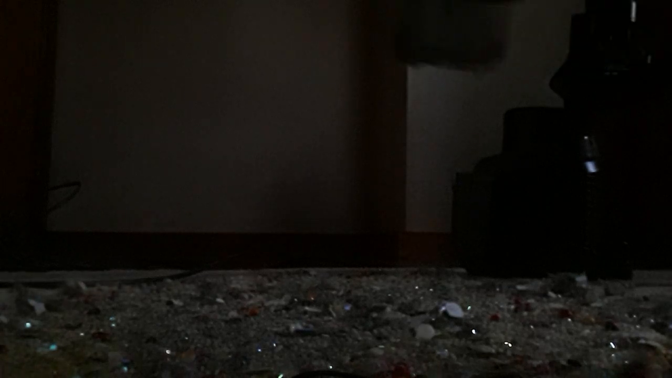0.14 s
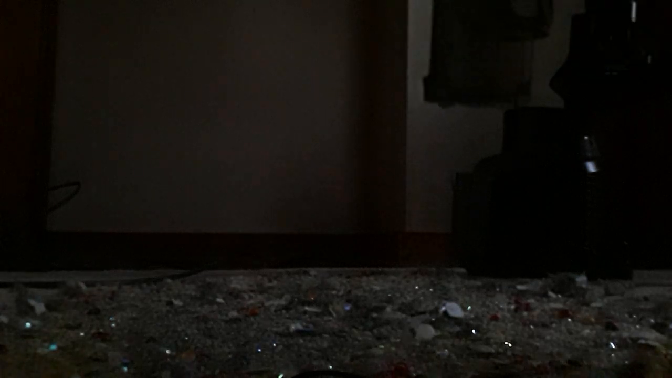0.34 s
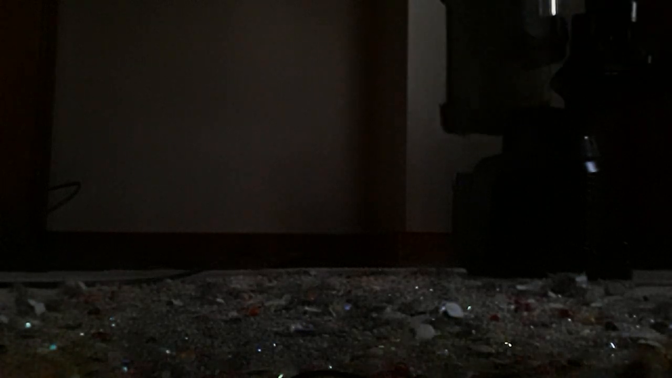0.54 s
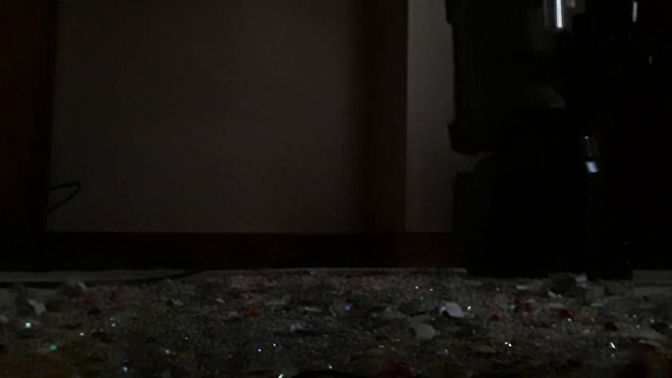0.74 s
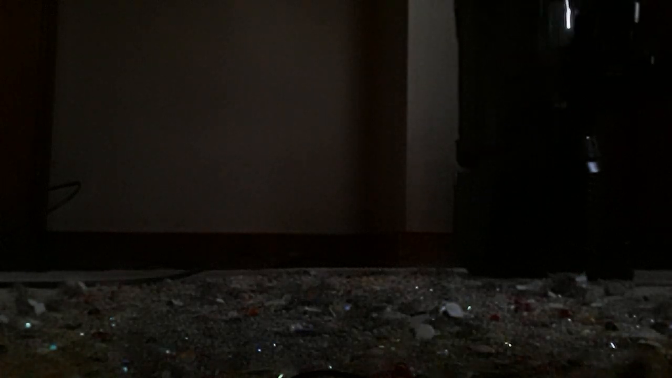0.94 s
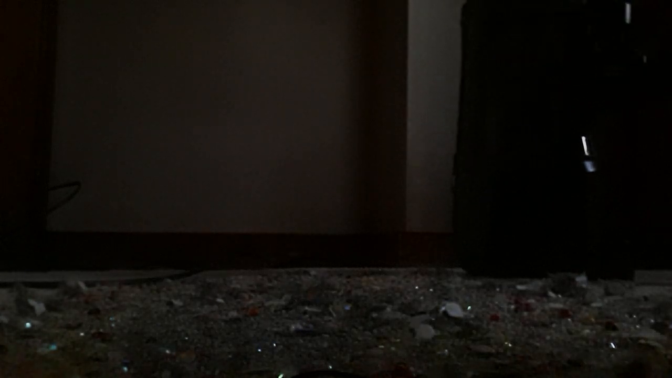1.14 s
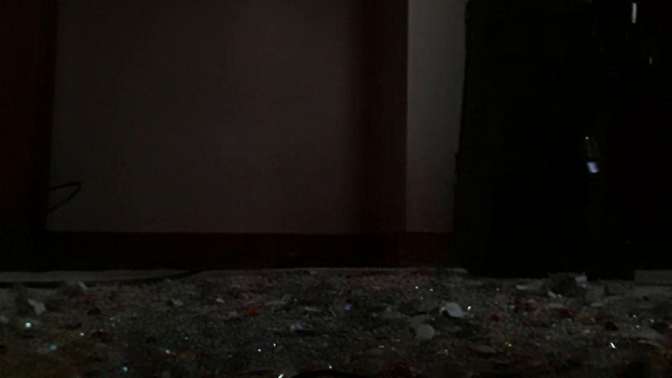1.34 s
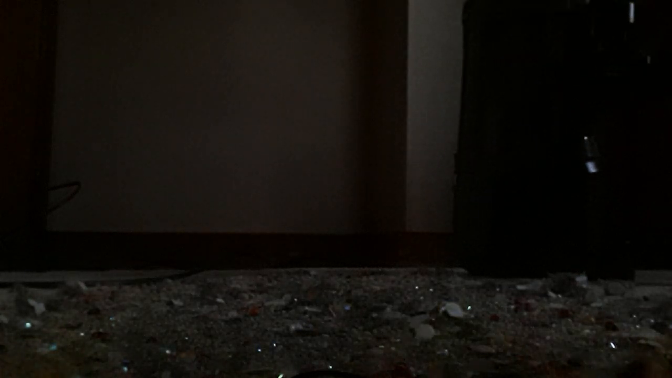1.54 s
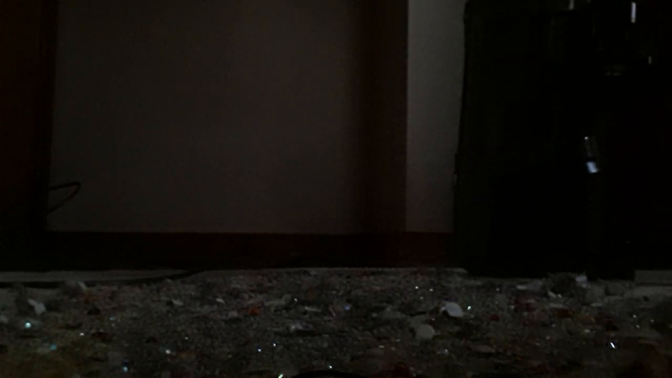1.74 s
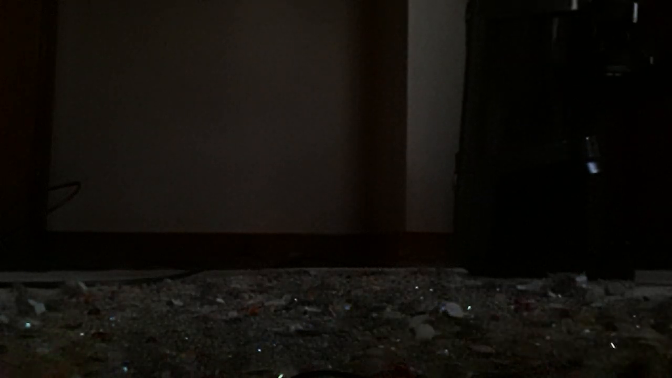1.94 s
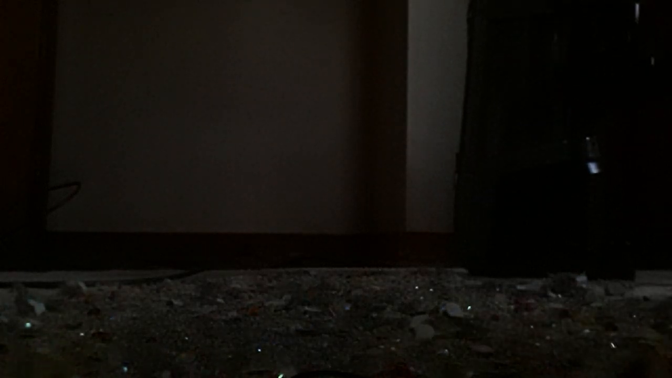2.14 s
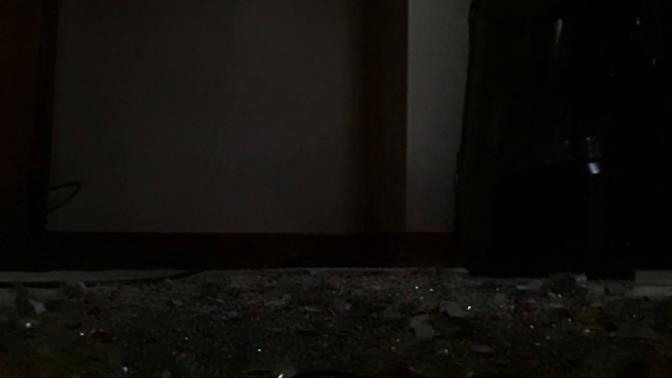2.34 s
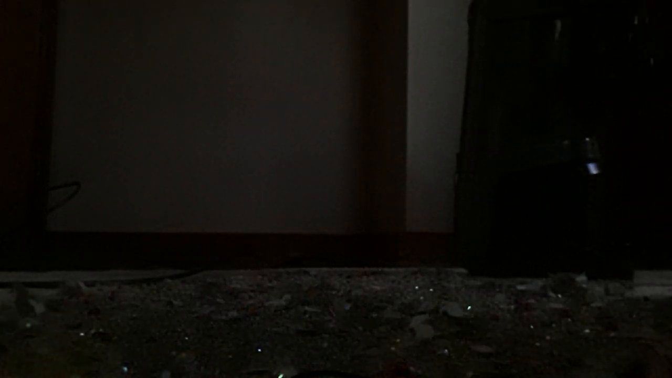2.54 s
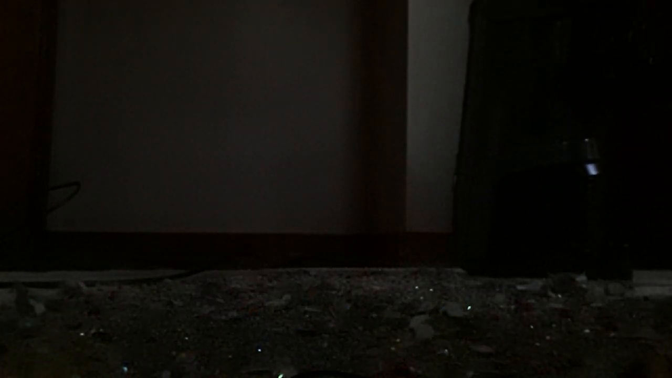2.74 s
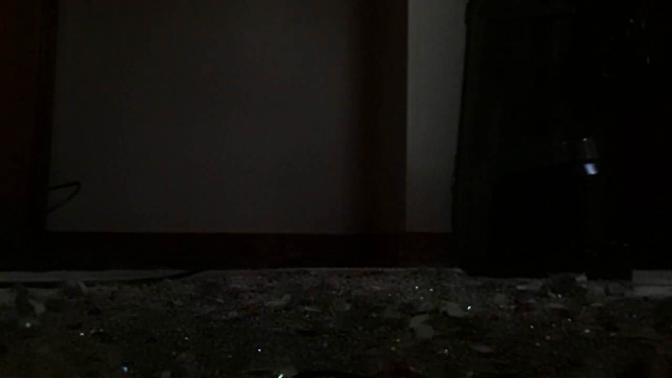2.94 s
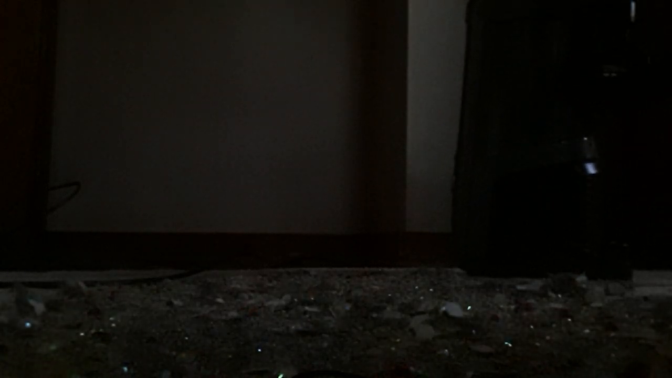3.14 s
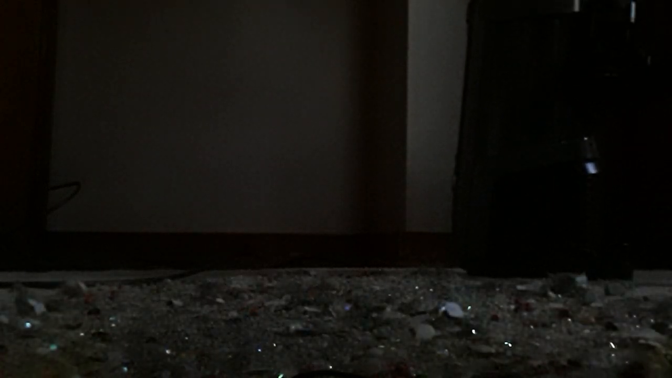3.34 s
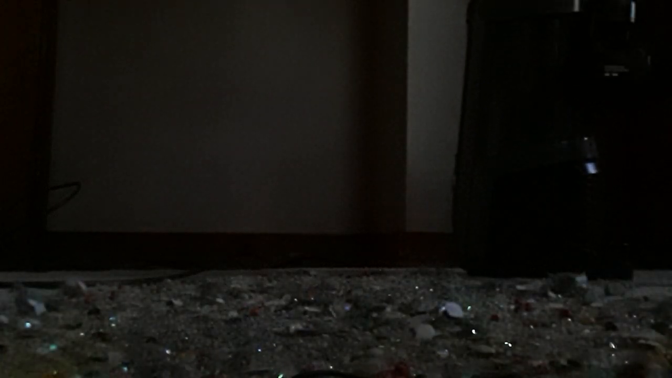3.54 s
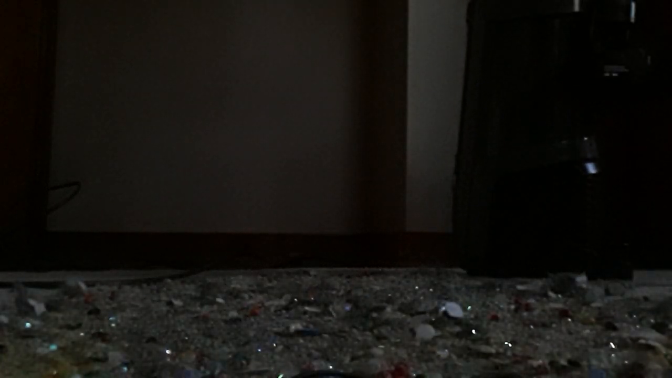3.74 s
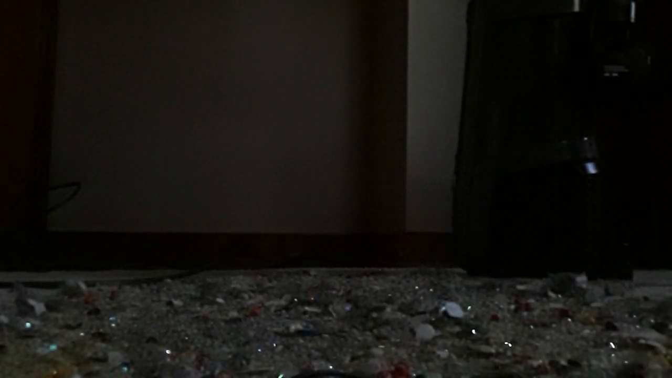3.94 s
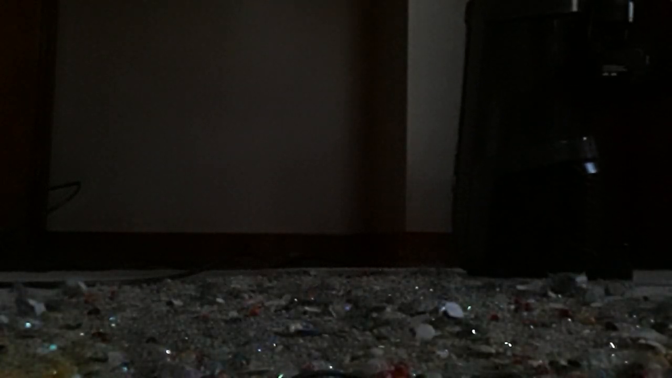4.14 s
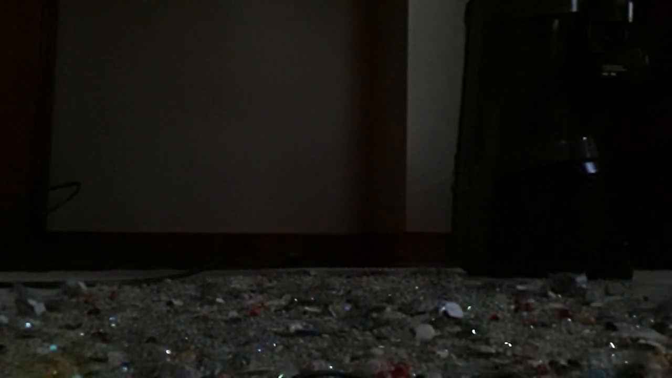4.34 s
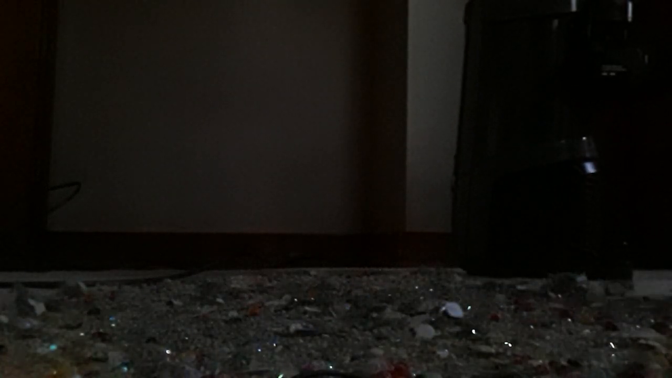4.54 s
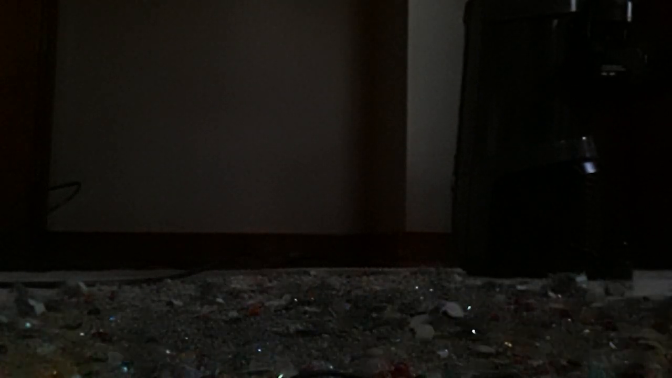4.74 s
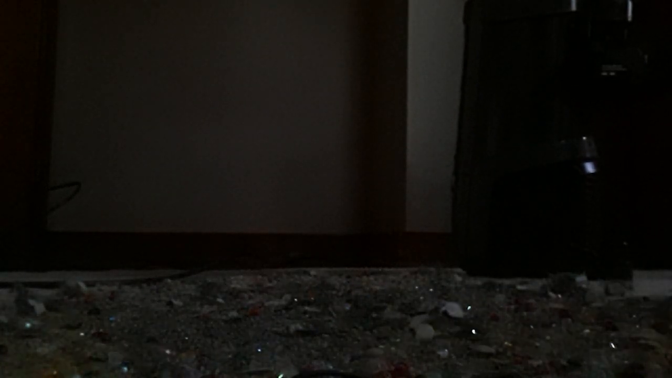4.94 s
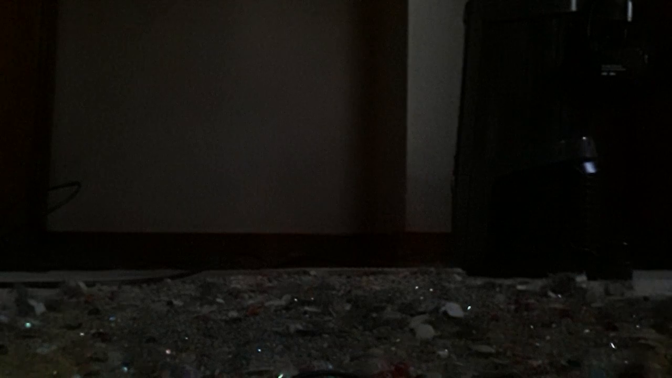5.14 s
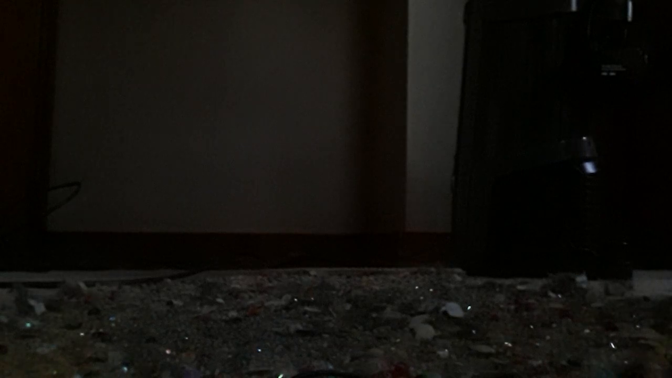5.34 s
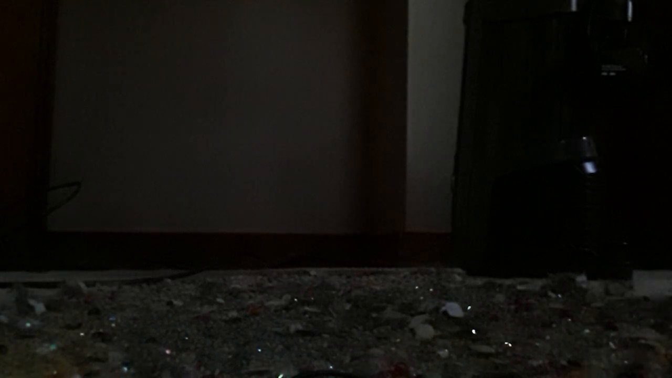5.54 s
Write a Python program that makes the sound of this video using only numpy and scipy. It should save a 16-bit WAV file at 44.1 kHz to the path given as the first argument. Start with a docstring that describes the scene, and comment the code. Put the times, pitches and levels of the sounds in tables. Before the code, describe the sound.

A hollow plastic container bumps into its seat with clustered knocks, gets fiddled with, then snaps shut sharply in a small bare room.

```python
"""A soft building rumble and a faint steady hiss come first, then a thin click of a loose part.
A hollow plastic container is pushed into its seat in four bumps, fiddled with, then snapped shut by a latch.
Each knock, tap and snap mixes a low ring, shaken walls, a clack near 1 kHz, a hard edge and a tick.
Rubbing is a patter of tiny clicks. A small bare room answers with fading noise."""
import sys
import numpy as np
from scipy import signal
from scipy.fft import rfft, irfft, next_fast_len
from scipy.io import wavfile
from scipy.ndimage import uniform_filter1d

SR = 44100
rng = np.random.default_rng(int(sys.argv[2]) if len(sys.argv) > 2 else 0)


def volts(x):
    """Linear amplitude factor 10**(x/20) for a level x in dB, scalar or array-like."""
    e = np.asarray(x, float) / 20
    return 10 ** e


def store_wav(level_fs):
    """Save 16-bit WAV to argv[1]."""
    pcm = np.round(np.clip(np.atleast_2d(level_fs), -1, 1) * 32767)
    wavfile.write(sys.argv[1], SR, pcm.T.astype(np.int16))


N = 246959  # length in samples

# colour of the building rumble: pitch_hz, relative level_db
RUMBLE_COLOUR = [(15, -39.5), (25, -18.5), (56, -7.5), (91, -8.5), (113, -2.5), (240, -6), (306, -7.5),
                 (471, -10), (617, -25), (725, -18.5), (1120, -24.5), (1350, -28), (1760, -34), (3950, -34),
                 (15600, -38.5)]
# resonances in the rumble: pitch_hz, width_hz, level_db before swelling
RUMBLE_RESONANCES = [(114.3, 6.8, -81), (319.5, 40, -69.5), (628, 300, -72)]
# colour of the faint steady hiss, unequal and opposite in the two channels: pitch_hz, relative level_db
HISS_COLOUR = [(35, -46), (60, 3.5), (242, 0), (395, 2), (644, 0.5), (2110, -4), (8140, -4), (15600, -7.5)]
# thin dry clicks of a loose part: start_s, level_db, centre_hz
LOOSE_CLICKS = [(0.207, -56.5, 1780), (0.711, -45.5, 1780), (2.034, -55, 2000), (2.076, -63, 2000),
                (2.113, -64, 1800), (2.19, -52, 2200), (2.274, -61, 2640), (3.316, -42, 1300),
                (3.3206, -36.5, 3000), (3.3255, -45, 3320), (4.698, -57, 6000)]
# colour of those clicks: multiple of the centre (no unit), level_db
CLICK_SHAPE = [(.25, -22), (.67, 3.5), (1.5, -3), (2.6, -13), (4, -42)]
# how long the room takes to die by 60 dB: pitch_hz, fade_s
ROOM_FADE = [(300, 0.31), (700, 0.23), (1800, 0.27), (4800, 0.21), (12000, 0.22)]
# knocks on the shell, from heavy bumps to faint taps, each with its own thud level:
# start_s, clack_db, thud_db (re clack), thud_tilt_db (per octave), edge_db (re clack), clack_hz
SHELL_KNOCKS = [(0.352, -26.5, 4.5, -5, -11, 1044), (0.363, -27, -12, 0, -3, 910),
                (0.546, -27, -2, -4, -14, 990), (0.568, -24.5, 2.5, -5.5, -9, 884),
                (0.576, -26, 2.5, 2.5, -10, 970), (0.589, -28.5, -11, 13, -5, 934),
                (0.603, -34, -28, 0, -22, 780), (0.753, -26.5, -2, 6.5, -12, 1070),
                (0.782, -22, -28, 9, -22, 870), (0.79, -20, 2.5, 0.5, -12.5, 1030),
                (0.799, -18.5, 1, 4, -5, 800), (0.812, -33, -30, 15.5, -30, 883),
                (0.8455, -21.5, -8.5, 2, -21, 1063), (0.87, -45, 12, 1, -20, 1110),
                (0.994, -45, 12.5, -7, -9.5, 1150), (1.013, -45, 16, 8.5, -3.5, 796),
                (1.049, -19.5, 6.5, -2.5, -14, 954), (1.064, -25.5, 4, -5, -4.5, 800),
                (1.099, -22.5, -2.5, 10, -15, 996), (1.112, -20, -3, 3, -5.5, 873),
                (1.131, -41.5, 13.5, -3.5, -27, 770), (1.44, -37, -5.5, -9, -14, 886),
                (2.254, -46.5, -1, -10, -3, 750), (2.363, -48.5, 3.5, 0.5, -8.5, 920),
                (4.636, -44.5, 2.5, -5.5, -8.5, 977), (4.893, -47.5, 1.5, -3.5, -16, 893)]
# light taps of the fingers: start_s, clack_db, edge_db (re clack), clack_hz
FINGER_TAPS = [(0.486, -44.5, -7, 980), (1.362, -35, -25, 906), (1.787, -35.5, -25, 865),
               (1.886, -39.5, -19, 891), (1.98, -40.5, -7, 943), (2.154, -42.5, -3.5, 700),
               (2.217, -37, -16, 920), (2.344, -42, -7, 1070), (2.448, -36, -22, 866),
               (2.503, -37, -21.5, 943), (2.587, -41, -19, 994), (3.782, -50, -18.5, 832),
               (3.897, -37.5, -26, 853), (3.949, -48.5, -18, 752), (4.143, -46, -17, 815),
               (4.185, -47.5, -18.5, 956), (4.426, -39, -33, 780), (4.582, -44.5, -17, 1035),
               (4.956, -54.5, -20, 886), (5.27, -46, -17, 759), (5.462, -46.5, -16.5, 854)]
# low ringing modes of the shell: pitch_hz, level_db, fade_s (to fall by 60 dB)
SHELL_MODES = [(133.7, 8.5, 0.16), (185.4, 5.5, 0.23), (264.1, 6.5, 0.32), (291.6, 8.5, 0.14),
               (456, -9.5, 0.32)]
# colour of the shaken shell walls: pitch_hz, level_db
SHELL_WALLS = [(40, -18), (120, -12.5), (220, -30.5), (310, -2), (380, -3.5), (445, -1), (510, -9.5),
               (590, -4.5), (720, -5), (1000, -39.5), (2000, -78)]
# colour of the hard edge of each contact: pitch_hz, level_db
HARD_EDGE = [(300, -52), (700, -23), (1300, 7.5), (1950, 5), (2400, -2.5), (2800, -0.5), (3200, -6.5),
             (3650, -5.5), (4400, -11.5), (6000, -42), (10000, -78.5)]
# colour of the tick in knocks and taps: pitch_hz, level_db
SHELL_TICK = [(1500, -64), (3500, -18), (5100, 3), (6300, -2.5), (8200, -1), (10000, -9.5), (12000, -16),
              (16000, -26)]
# plastic sliding on plastic: start_s, peak_s, end_s, peak_db, treble_swish_db
SLIDES = [(0.786, 0.788, .9, -33, -11.5), (1.038, 1.085, 1.197, -40, -6.5), (1.296, 1.47, 1.46, -59, -10),
          (1.755, 1.898, 2.4, -67, 2), (2.088, 2.22, 2.6, -65.5, -7), (2.307, 2.394, 2.6, -67, -20),
          (3.885, 3.964, 4.07, -64, -20.5), (4.1, 4.16, 4.27, -66, 9), (4.545, 4.65, 4.72, -66.5, 19.5),
          (4.881, 4.927, 4.97, -67, 2)]
# colour of the dull part of the sliding: pitch_hz, level_db
SCUFF_COLOUR = [(100, -40.5), (300, -8.5), (900, 6), (1800, -4), (3500, -16.5), (6000, -31), (11000, -65)]
# colour of the treble swish in the sliding: pitch_hz, level_db
SWISH_COLOUR = [(1500, -28), (3000, -7), (5000, -5), (6500, -5), (8500, 1.5), (10500, -21), (14000, -21.5)]
# latch snaps: start_s, clack_db, wall_db (re clack, before the common wall level), edge_db (re clack), clack_hz
LATCH_SNAPS = [(2.6276, -24.5, -4.5, -19.5, 1040), (2.6344, -10.5, -12, -27, 1070),
               (2.6397, -10, -1.5, -6.5, 940), (2.6429, -12.5, 1, -8, 998), (2.999, -32.5, -1, -7, 913),
               (3.0559, -20.5, -5, -10.5, 950), (3.062, -24, -3.5, -8.5, 804)]
# the floor under the shell: pitch_hz, level_db, fade_s (to fall by 60 dB)
FLOOR_MODES = [(62, 0, .12), (92, 0, .1), (178, -1.5, .12)]
# colour of the walls near the latch: pitch_hz, level_db
LATCH_WALLS = [(100, -30), (220, -16.5), (320, -4), (430, -4), (590, -0.5), (720, -1), (1000, -4),
               (1300, -7.5), (1800, -23.5), (3000, -50.5)]
# colour of the latch tick: pitch_hz, level_db
LATCH_TICK_COLOUR = [(1470, -35), (2500, -1), (3050, -11), (3780, -0.5), (4200, -13), (5160, -11),
                     (5790, -22), (8230, -16.5), (11200, -37.5), (15500, -40.5)]
# strength of the direct sound, strongest at the latch snap, weakest at the end: time_s, level_db
DIRECT_LEVEL = [(0, -3), (1.7, -2.5), (2.65, 0), (3.0, -3.5), (5.6, -9)]

WALL_DB = -7.5  # common wall level, added to the thud level or to the wall level of a snap
SCATTER_DB = 2  # how much the strength of each ringing mode varies from blow to blow
LUCK_SIZE = 2048  # random samples that shape one part of a contact


def colour(x, points):
    """Weights the spectrum of x by (Hz, dB) points."""
    size = next_fast_len(len(x))
    hz, db = np.transpose(points)
    f = np.maximum(np.arange(size // 2 + 1) * SR / size, 1)
    gain = volts(np.interp(np.log(f), np.log(hz), db))
    return irfft(rfft(x, size) * gain, size)[:len(x)]


def level(x, db):
    """Scales x to an rms level."""
    return x * volts(db) / np.sqrt(np.mean(x ** 2))


def add(track, sound, s):
    """Mixes a sound into the track from time s."""
    i = int(s * SR)
    track[i:i + len(sound)] += sound[:len(track) - i]


def walk(rate):
    """Random levels held for 1 / rate seconds and smoothed twice."""
    hold = int(SR / rate)
    steps = np.repeat(rng.standard_normal(N // hold + 1), hold)
    return uniform_filter1d(uniform_filter1d(steps, hold), hold)[:N]


def rumble():
    """Building rumble fading up into hiss; its resonances swell and fade on their own."""
    out = level(colour(rng.standard_normal(N), RUMBLE_COLOUR), -62.5)
    for hz, width, db in RUMBLE_RESONANCES:
        peak = [(hz - 2 * width, -50), (hz, 0), (hz + 2 * width, -50)]
        band = colour(rng.standard_normal(N), peak)
        swell_db = 3.0 * walk(6.5)
        out = out + level(band, db) * volts(swell_db)
    return out


def steady_hiss():
    """Faint steady hiss: one coloured noise, unequal and opposite in the two channels."""
    hiss = level(colour(rng.standard_normal(N), HISS_COLOUR), -77.5)
    return hiss * np.array([[.6], [-1.4]])


def crack(points, chance, t60, rise_s):
    """A burst of tiny slips: the timing of a fading noise with the even spectrum of the points, peak near 1."""
    t = np.arange(len(chance)) / SR
    fade = np.exp(-np.log(1000) * t / t60)
    spectrum = rfft(chance * (1 - np.exp(-t / rise_s)) * fade)
    # even out the random peaks and dips of the spectrum, but keep its timing
    strength = np.abs(spectrum)
    burst = colour(irfft(spectrum / (strength + .3 * strength.mean())), points)
    burst = burst * np.minimum(t / rise_s, 1) * np.cos(np.pi / 2 * t / t[-1]) ** 2
    return burst / np.sqrt(np.sum(burst ** 2) / (t60 * SR / 20))


def clicks():
    """Single slips, each a wide burst of a millisecond or two round its own centre."""
    out = np.zeros(N)
    for s, db, hz in LOOSE_CLICKS:
        points = [(k * hz, part_db) for k, part_db in CLICK_SHAPE]
        add(out, volts(db) * crack(points, rng.standard_normal(512), 0.011, 0.00031), s)
    return out


def room(x):
    """Diffuse echo: half-octave noise bands that build up in a few ms and die at their own rates."""
    build_s, far_wall_s, near_wall_share = 0.0037, .015, 0.53
    late_db, late_stretch = -22.5, 2.25  # the next room answers faintly and dies more slowly
    t = np.arange(int(.6 * SR)) / SR
    hz, t60 = np.transpose(ROOM_FADE)
    tail = 0
    for f in 250 * 2 ** np.arange(0, 6.2, .5):
        edges = [(f / 1.5, -60), (f / 1.19, 0), (f * 1.19, 0), (f * 1.5, -60)]
        band = level(colour(rng.standard_normal(len(t)), edges), 0)
        fall = np.log(1000) * t / np.interp(np.log(f), np.log(hz), t60)
        fade = np.exp(-fall) + volts(late_db) * np.exp(-fall / late_stretch)
        tail = tail + np.sqrt(f) * band * fade  # wider bands carry more power
    # the nearest walls answer first, the far ones in a bunch some ms later
    far = (1 - near_wall_share) / (1 + np.exp((far_wall_s - t) / .002))
    tail = tail * (1 - np.exp(-(t / build_s) ** 2)) * (near_wall_share + far)
    # many overlapping modes: no single pitch stands far out
    spectrum = rfft(tail)
    size = np.abs(spectrum)
    strength = uniform_filter1d(size, size=9) / uniform_filter1d(size, size=151)
    tail = irfft(spectrum / strength ** .15, len(t))
    tail = tail * np.clip(4 * (.8 - t / t[-1]), 0, 1)  # ends in silence
    return signal.fftconvolve(x, tail / np.sqrt(np.sum(tail ** 2)))[:N]


def ring(modes, luck, rise_cycles):
    """Decaying modes of one blow, peak near 1; the contact spot varies their strength and pitch a little."""
    hz, db, t60 = np.transpose(modes)[:, :, None]
    t = np.arange(int(max(t60[:, 0]) * SR)) / SR
    luck = luck[:2 * len(hz), None]
    gain = volts(db + SCATTER_DB * luck[::2])
    swing = np.sin(2 * np.pi * hz * (1 + .02 * luck[1::2]) * t)
    # each mode needs some cycles to build up, so the lows come late
    build = 1 - np.exp(-(t * hz / rise_cycles) ** 2)
    fade = np.exp(-np.log(1000) * t / t60)
    return (gain * swing * build * fade).sum(axis=0) / np.sqrt(np.sum(gain ** 2))


def hard_contact(wall, clack, edge_db, tick, luck):
    """The short hard parts of one contact: shaken walls, a ringing clack, a hard edge and a tick."""
    wall_points, wall_db = wall
    hz, clack_t60 = clack
    tick_points, tick_db = tick  # tick level re edge
    clack_luck, tick_luck, wall_luck = luck
    modes = [(hz, 0, clack_t60), (0.93 * hz, -5, .014), (0.8 * hz, -7, .013), (0.81 * hz, -8, .012)]
    out = volts(wall_db + WALL_DB) * crack(wall_points, wall_luck, 0.063, 0.0018)
    add(out, ring(modes, clack_luck, 1.1), 0)
    out += volts(edge_db) * crack(HARD_EDGE, clack_luck, 0.025, 0.0018)
    out += volts(edge_db + tick_db) * crack(tick_points, tick_luck, 0.04, 0.0018)
    return out


def strike_shell(lows, hard, row, clack_t60, tick_db):
    """A blow on the shell: low modes ring on by themselves, hard parts are short and die fast."""
    s, clack_db, thud_db, tilt_db, edge_db, hz = row
    luck = rng.standard_normal((4, LUCK_SIZE))
    lowest = SHELL_MODES[0][0]
    modes = [(f, db + tilt_db * np.log2(f / lowest), t60) for f, db, t60 in SHELL_MODES]
    add(lows, volts(clack_db + thud_db) * ring(modes, luck[0], 1.8), s)
    parts = hard_contact((SHELL_WALLS, thud_db), (hz, clack_t60), edge_db, (SHELL_TICK, tick_db), luck[1:])
    add(hard, volts(clack_db) * parts, s)


def knocks():
    """Knocks on the shell, from heavy bumps to faint taps, each with its own thud level."""
    lows, hard = np.zeros((2, N))
    for row in SHELL_KNOCKS:
        strike_shell(lows, hard, row, clack_t60=0.031, tick_db=-25.5)
    return lows, hard


def taps():
    """Light taps of the fingers, with hardly any thud."""
    lows, hard = np.zeros((2, N))
    for s, clack_db, edge_db, hz in FINGER_TAPS:
        row = (s, clack_db, -19.5, 0, edge_db, hz)  # faint thud, no tilt
        strike_shell(lows, hard, row, clack_t60=0.027, tick_db=-19.5)
    return lows, hard


def slide():
    """Stick-slip: a dense patter of uneven micro-clicks while surfaces rub, with rising and easing pressure."""
    t = np.arange(N) / SR
    hits = rng.random(N) < 4000 / SR  # about 4000 a second
    grains = hits * volts(1.3 * rng.exponential(size=N)) * rng.standard_normal(N)
    scuff = level(colour(grains, SCUFF_COLOUR), 0)
    swish = level(colour(grains, SWISH_COLOUR), -19.5)
    out = 0
    for start, peak, end, db, swish_db in SLIDES:
        # start and end levels are in dB re the peak; silent outside
        press_db = np.interp(t, (start, peak, end), (-7, 0, -24.5), left=-200, right=-200)
        out = out + volts(db + press_db) * (scuff + volts(swish_db) * swish)
    return out


def snaps():
    """A latch snap is too light to move the whole shell: it shakes the walls and barely thumps."""
    lows, hard = np.zeros((2, N))
    for s, clack_db, wall_db, edge_db, hz in LATCH_SNAPS:
        luck = rng.standard_normal((4, LUCK_SIZE))
        add(lows, volts(clack_db - 28) * ring(FLOOR_MODES, luck[0], 0.65), s)
        parts = hard_contact((LATCH_WALLS, wall_db), (hz, 0.022), edge_db, (LATCH_TICK_COLOUR, -6), luck[1:])
        add(hard, volts(clack_db) * parts, s)
    return lows, hard


def scene():
    """All sources reach one microphone, so both channels are alike."""
    knock_lows, knock_hard = knocks()
    tap_lows, tap_hard = taps()
    snap_lows, snap_hard = snaps()
    lows = knock_lows + tap_lows + snap_lows
    hard = knock_hard + tap_hard + snap_hard + slide() + clicks()
    direct = volts(np.interp(np.arange(N) / SR, *np.transpose(DIRECT_LEVEL)))
    mono = lows + direct * hard + volts(-5) * room(hard) + rumble()
    return np.array([mono, mono])


def roll_off(x):
    """The treble ends steeply here."""
    return signal.sosfilt(signal.butter(12, 15770, fs=SR, output="sos"), x)


def record(dry):
    """The microphone cuts the deep bass below 50 Hz; a faint steady hiss lies over the result."""
    bass_cut = signal.butter(2, 50, "highpass", fs=SR, output="sos")
    mix = signal.sosfilt(bass_cut, dry) + steady_hiss()
    return roll_off(mix)


dry = scene()
out = record(dry)
store_wav(out)
```